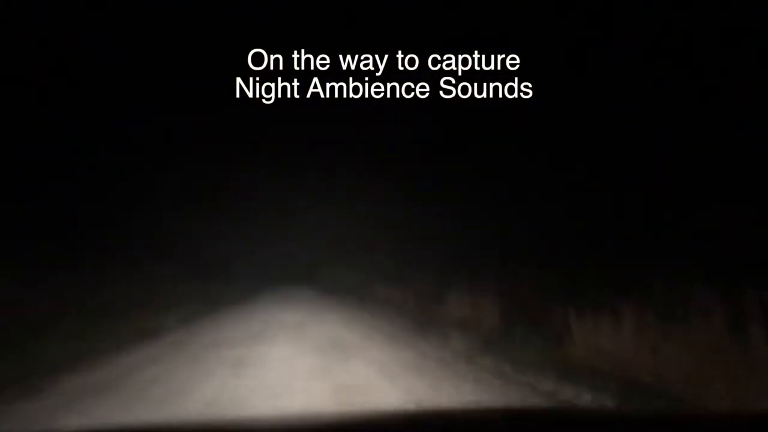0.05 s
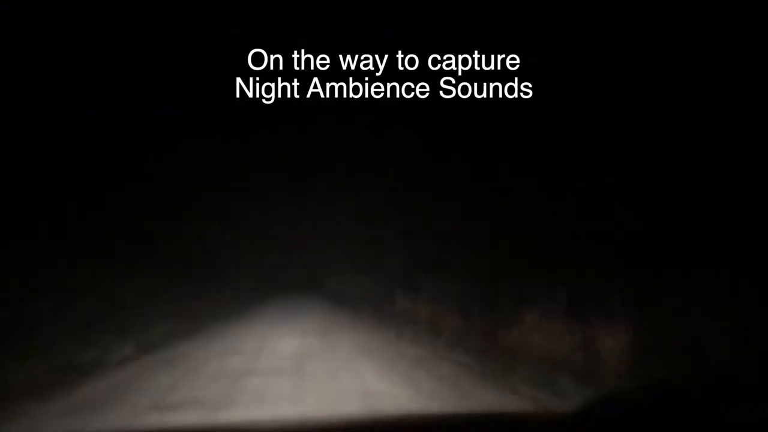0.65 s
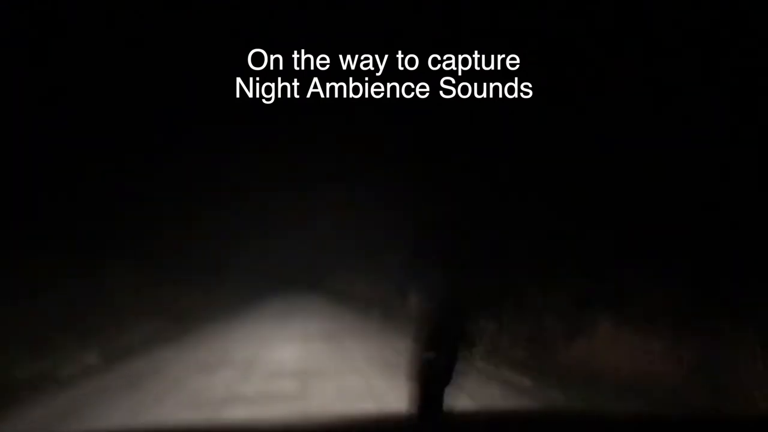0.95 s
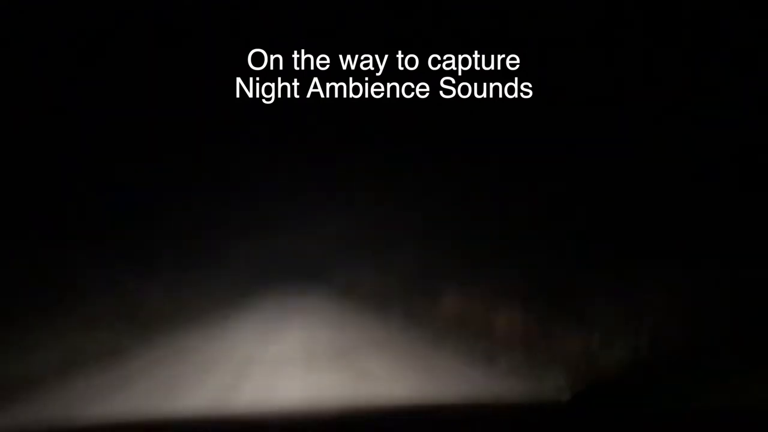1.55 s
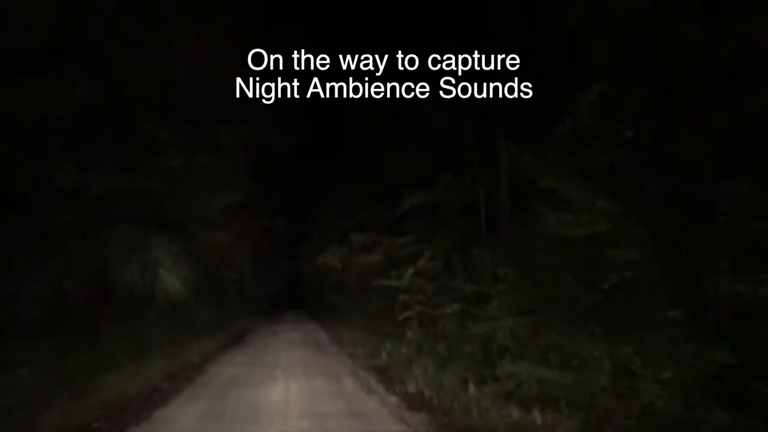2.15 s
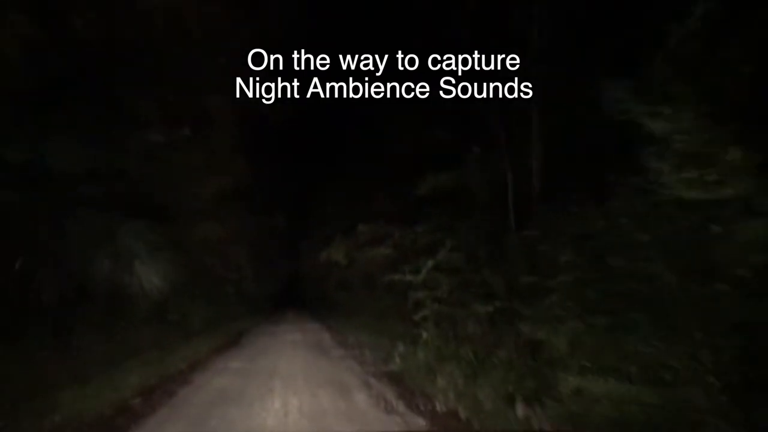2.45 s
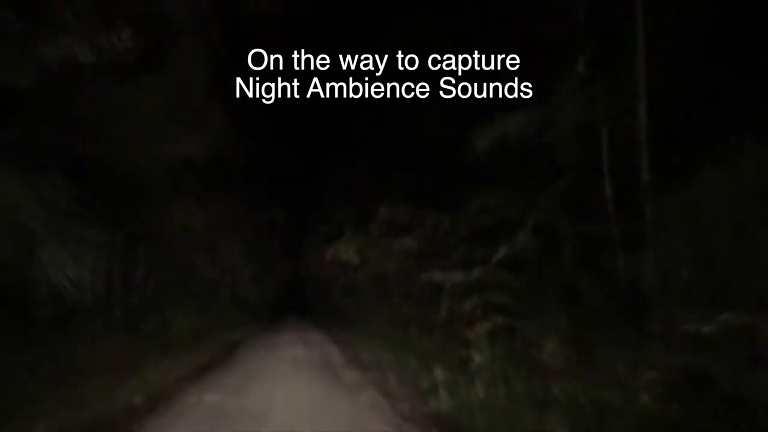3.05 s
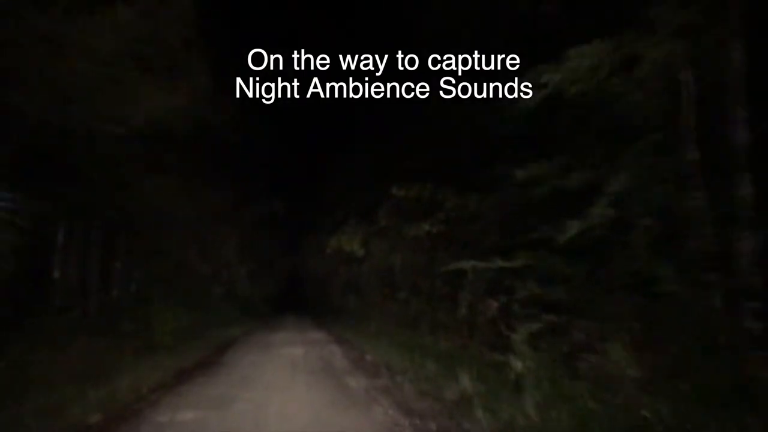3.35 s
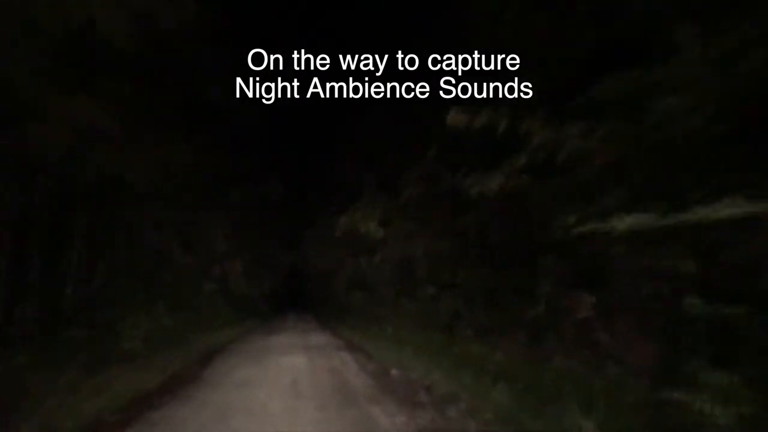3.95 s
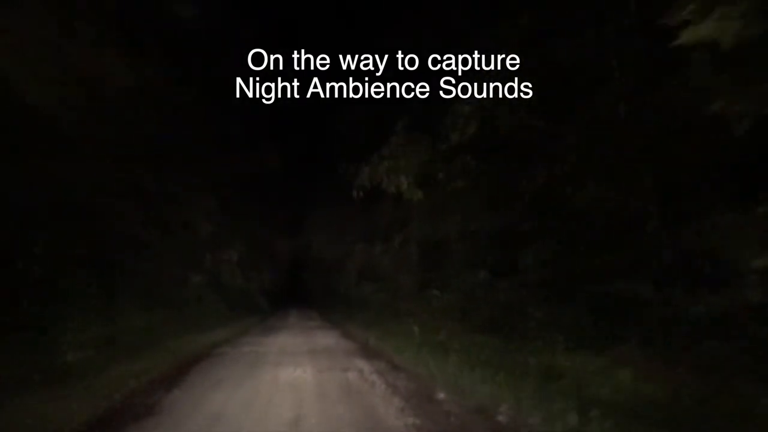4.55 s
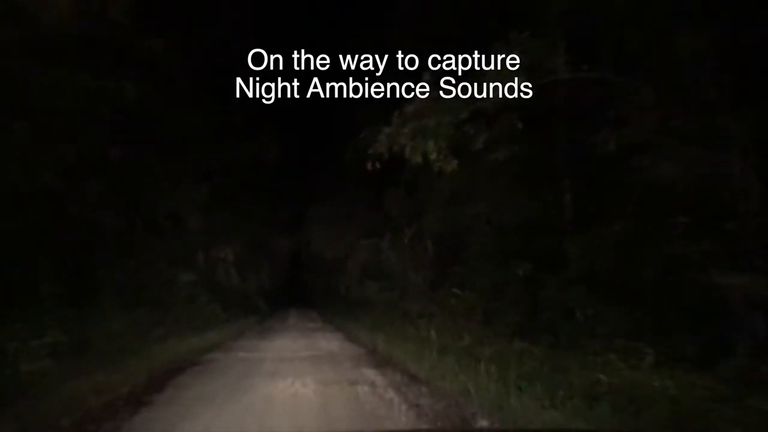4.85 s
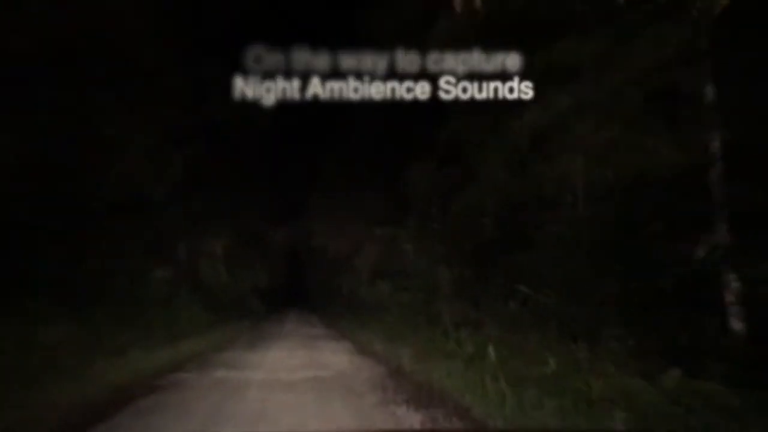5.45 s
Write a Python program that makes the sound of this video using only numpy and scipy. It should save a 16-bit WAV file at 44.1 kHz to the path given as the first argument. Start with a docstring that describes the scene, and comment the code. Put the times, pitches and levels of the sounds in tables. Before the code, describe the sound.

A car drives along a dirt road, heard from the front seat. A deep rumble and cabin boom run throughout, over a soft roar and crunch of tyres. The first part is rougher, with wheel thumps and small dry ticks close by. After about two seconds it cuts abruptly to a quieter stretch, where loose plastic trim rattles lightly and a faint rustle comes and goes.

```python
"""A car rumbles along a dirt road at night, heard from inside. The road shakes the body and makes the
cabin air boom at about 60 to 63 Hz, while the tyres hum, roar and crunch over grit. The wheels thump
on bumps, dry ticks sound close by, loose plastic trim rattles and a faint rustle comes and goes.
At 1.8 s the sound cuts abruptly from a louder, rougher part to a quieter one."""
import sys
import numpy as np
from scipy import signal
from scipy.fft import rfft, irfft, next_fast_len
from scipy.io import wavfile
from scipy.ndimage import map_coordinates

SR = 44100
rng = np.random.default_rng(int(sys.argv[2]) if len(sys.argv) > 2 else 0)


def wrap_up_sound(samples):
    """Save the sound to the file named by the first command line argument, as 16-bit audio."""
    columns = np.atleast_2d(samples).T
    # keep every value between -1 and 1, then stretch to whole-number steps
    tamed = np.clip(columns, -1, 1)
    steps = np.round(tamed * 32767).astype(np.int16)
    wavfile.write(sys.argv[1], SR, steps)


N = 242991

# How hard the road shakes the car: time_s, shake_db
ROAD_SHAKE = [(0, 2.5), (.1, 5), (.33, 2), (.5, 5.5), (.85, 4), (1.25, -1), (1.65, 1.5), (1.9, 0), (3.3, 0),
              (4.0, 0), (4.6, 0.5), (5.5, 1.1)]
# Tone of the car's deep heave, floor rumble and panel drone: frequency_hz, relative_db
HEAVE_TONE = [(19, -49.5), (26, -20.5), (32, -6.5), (39, -2), (47, 0.5), (58, -19), (80, -38)]
FLOOR_TONE = [(45, -32.5), (62, -3), (76, -0.5), (95, 1), (110, -5.5), (126, -5.5), (145, -12), (175, -21),
              (260, -44)]
PANEL_TONE = [(120, -23), (170, -5), (200, 3.5), (225, -0.5), (260, -1), (305, -3), (345, -8), (385, -15.5),
              (435, -15.5), (490, -21), (700, -37), (1200, -61)]
# Rippled ground that sets the cabin booming: start_s, length_s, push_db
RIPPLED_GROUND = [(0.077, 0.078, -33.5), (0.246, 0.075, -31.5), (0.607, 0.098, -35), (0.828, 0.062, -29),
                  (.94, .23, -28.5), (1.373, .08, -36), (1.968, 0.12, -36.5), (2.403, 0.082, -37.5),
                  (2.968, 0.3, -40), (3.888, 0.11, -37.5), (4.497, 0.07, -34), (5.242, 0.071, -34)]
# Air ringing inside the tyres: time_s, pitch_hz, level_db
TYRE_AIR = [(0, 250, -68), (.7, 250, -59.5), (1.3, 254, -72), (2.0, 256, -60.5), (3.2, 262, -64),
            (4.0, 266, -61.5), (5.5, 280, -62.5)]
# Tone of the tyres' roar and crunch, and of a fine hiss: frequency_hz, relative_db
DIRT_TONE = [(250, -8), (370, 1), (435, 3.5), (490, 0.5), (550, 5.5), (740, 0), (850, 1), (1100, -2.5),
             (1550, -7), (1950, -16), (2900, -22.5), (5000, -40.5)]
GRAVEL_TONE = [(900, -9), (1600, -4), (2300, -0.5), (3000, -1.5), (4100, -4), (4900, -12.5), (6500, -11.5),
               (9000, -36)]
HISS_TONE = [(3000, -13), (4800, -1), (6500, -0.5), (8000, -1.5), (10500, -4), (13000, -1), (14500, -6.5),
             (16000, -15)]
# Spells of faint rustle and hiss: start_s, length_s, middle_lift_db, treble_lift_db
RUSTLE_SPELLS = [(2.295, .22, 4.5, 5.5), (2.719, .65, 2, 8), (5.233, .3, 8, 8.5)]
# Wheels hitting bumps: start_s, thump_db, fade_s, thud_db, heave_db, shudder_db
# (fade_s is always the time a sound takes to fall by 60 dB)
WHEEL_BUMPS = [(0.054, -51.5, .16, -53, -45.5, -57), (0.448, -48.5, .07, -52, -41, -43),
               (0.826, -55, 0.17, -54, -51.5, -43.5), (1.205, -50.5, 0.13, -62, -43.5, -44),
               (1.43, -59, 0.059, -53, -48, -61.5), (1.647, -60, 0.086, -47.5, -35, -42.5),
               (2.34, -66, .12, -60, -54, -44), (2.76, -62, .16, -58, -40.5, -48),
               (3.12, -71, .1, -62, -51.5, -44), (4.32, -76, 0.085, -61, -44, -49),
               (5.36, -64, 0.11, -59, -48, -45.5)]
# Tone of a bump's thump and deeper thud: frequency_hz, relative_db
THUMP_TONE = [(180, -18), (320, 6), (550, 1), (850, -4), (1300, -16.5), (2200, -35.5)]
THUD_TONE = [(80, -18), (140, -1.5), (230, -4.5), (330, -6), (520, -25.5)]
# Small hard contacts: start_s, strength_db, brightness_db, favoured_pitch_hz
TICK_HITS = [(0.0851, -58.5, 3, 2700), (0.1319, -55.5, 1.5, 5400), (.204, -58, 2.5, 2800),
             (.2793, -67.5, 0, 6000), (.338, -62, 3.5, 8500), (0.3877, -62.5, -2, 4000),
             (.435, -62.5, -1, 5000), (0.4446, -70, -10, 4000), (0.4654, -57, 3.5, 3400),
             (.649, -71, -4.5, 4900), (.822, -59.5, -1, 8500), (.8534, -64, 0, 4900),
             (0.8685, -63, 0, 8800), (1.0411, -65, 2, 6800), (1.1473, -74.5, 0, 6060),
             (1.3334, -79, -3, 6000), (4.888, -89, -6, 3800), (5.041, -87, -9, 3800),
             (5.053, -86, -8, 3800)]
# The notes that ring in a tick: pitch_hz, relative_db, fade_s
TICK_NOTES = [(1510, -11, 0.0016), (2730, -1.5, 0.0033), (3950, -1.5, 0.005), (5350, -3, 0.0032),
              (6700, 1.5, 0.0025), (8500, -2.5, 0.0023), (11470, 4, 0.0018), (13080, 0.5, 0.0021)]
# Loose trim striking: start_s, strength_db, brightness_db, ring_strength_db
TRIM_HITS = [(.354, -73, 5, -81), (0.3578, -72.5, 5, -85), (0.4473, -71.5, -6.5, -85),
             (.766, -68, 4.5, -68), (0.776, -68, -1.5, -81), (1.207, -72.5, -8, -79),
             (2.296, -76, 1.5, -80), (2.308, -78, -4, -92), (2.3542, -77, -1.5, -91),
             (2.3925, -71, -2.5, -88), (2.671, -81, -9, -95), (2.735, -82, -9, -100),
             (2.748, -77, 2.5, -74), (2.769, -77, -3, -76), (2.839, -85, -10, -98), (3.063, -84, 2.5, -100),
             (3.263, -73, 4, -73), (3.281, -78, 2.5, -76), (3.487, -88, -6, -105), (3.637, -87, -6, -98),
             (3.89, -86, -4, -100), (4.1445, -87, -6, -100), (5.153, -80.5, 2, -75),
             (5.277, -75.5, -1, -73.5), (5.289, -91.5, 10.5, -93), (5.3357, -77.5, 5, -94),
             (5.362, -76, -4, -96), (5.389, -77, 2, -95), (5.428, -74.5, -4.5, -88), (5.44, -73.5, 8, -91),
             (5.464, -80.5, -5.5, -76), (5.503, -75, 0, -75)]
# Tone of a rattle's low knock, middle clack and high snap: frequency_hz, relative_db
KNOCK_TONE = [(300, -13.5), (800, -4), (1400, 6), (1900, -0.5), (2500, -1), (3300, -4), (5000, -21)]
CLACK_TONE = [(2000, -20.5), (3000, 0.5), (4400, -1), (5300, -1), (6400, -1.5), (7400, -9.5), (10000, -28)]
SNAP_TONE = [(5500, -22.5), (8000, 2.5), (9300, 3.5), (10400, -5), (12000, 4.5), (13500, -2), (16000, -7)]
# The notes the trim rings with: pitch_hz, relative_db, fade_s
TRIM_NOTES = [(1714, -4, 0.05), (2950, -4, 0.028), (3660, -6, 0.024), (4340, -2.5, 0.032),
              (4600, 3.5, 0.04), (6140, -2.5, 0.043), (6400, -10, 0.02)]

CUT_S = 1.8  # the sound cuts abruptly from louder and rougher to quieter
BOOM_IDLE_HZ, BOOM_IDLE_PUSH_DB = 60.1, -43  # the cabin boom between ripples
LOW_CUT_HZ, HIGH_CUT_HZ = 26.2, 15800


def amp(db):
    """Turn decibels into a number to multiply by."""
    return 10 ** (np.asarray(db) / 20)


def unit(x):
    """Scale a sound to an average power of 1."""
    return x / np.sqrt(np.mean(x ** 2) + 1e-20)


def curves(rows):
    """Join a table's points with lines: one curve for each column after the time."""
    times_s, *columns = np.transpose(rows)
    return [np.interp(np.arange(N) / SR, times_s, column) for column in columns]


def wobble(rate):
    """A smooth curve through `rate` random points a second."""
    points = rng.standard_normal(int(N * rate / SR) + 4)
    return map_coordinates(points, [np.arange(N) * rate / SR])


def swell(start_s, length_s, rise_s, fall_s):
    """A curve that rises from 0 to 1, holds, and falls once length_s has passed."""
    t = np.arange(N) / SR - start_s
    return np.clip(t / rise_s, 0, 1) * np.clip(1 - (t - length_s) / fall_s, 0, 1)


def filtered(x, gain_at):
    """Multiply each frequency in a sound by gain_at(hz)."""
    size = next_fast_len(N + SR // 2)
    return irfft(rfft(x, size) * gain_at(np.fft.rfftfreq(size, 1 / SR)), size)[:N]


def shaped(x, tone):
    """Give a sound the balance of lows and highs in a tone table, at power 1."""
    points_hz, db = np.transpose(tone)
    gain_at = lambda hz: amp(np.interp(np.log(hz + 1), np.log(points_hz), db, left=-120, right=-120))
    return unit(filtered(x, gain_at))


def noise(tone):
    """Noise with the given tone, at power 1."""
    return shaped(rng.standard_normal(N), tone)


def steady(x, span_s):
    """Even out the swells that last longer than span_s."""
    power = signal.fftconvolve(x ** 2, np.hanning(int(span_s * SR)), "same")
    return unit(x / np.sqrt(np.abs(power) + 1e-9))


def hum(hz, drift_hz, drift_rate):
    """A note kept ringing by the road; its pitch wanders."""
    pitch_hz = hz + drift_hz * wobble(drift_rate)
    return np.sqrt(2) * np.sin(2 * np.pi * np.cumsum(pitch_hz) / SR)


def grains(per_second, range_db):
    """Tiny impacts of uneven size at random moments."""
    hits = rng.random(N) < per_second / SR
    direction = np.sign(rng.standard_normal(N))
    return unit(hits * direction * amp(range_db * rng.random(N)))


def add(track, start_s, sound):
    """Mix a sound into the track at start_s."""
    room = track[max(round(start_s * SR), 0):][:len(sound)]
    room += sound[:len(room)]


def body_rumble(shake_db, before_cut):
    """The uneven road heaves the car, shakes its floor and makes the panels drone."""
    lurch, shudder = np.zeros((2, N))
    for start_s, *_, heave_db, shudder_db in WHEEL_BUMPS:
        # the springs take the load just before the blow
        load = swell(start_s - 0.07, length_s=0.098, rise_s=0.054, fall_s=0.07)
        lurch += amp(heave_db) * load
        shudder += amp(shudder_db) * load
    rolling = amp(-46.5 + 0.22 * shake_db + 1.5 * wobble(3.8))
    # hypot adds two levels by their power
    heave = np.hypot(rolling, lurch) * steady(noise(HEAVE_TONE), span_s=0.26)
    floor = np.hypot(amp(-46.5 + 0.92 * shake_db), shudder) * steady(noise(FLOOR_TONE), span_s=0.37)
    panels = amp(-58 + shake_db + 0.8 * before_cut) * steady(noise(PANEL_TONE), span_s=0.22)
    return heave + floor + panels


def cabin_boom():
    """The cabin air rings at its lowest note, steadier and a little higher when pushed harder."""
    push = sum(amp(db) * swell(start_s, length_s, rise_s=0.031, fall_s=0.05)
               for start_s, length_s, db in RIPPLED_GROUND)
    push_db = 20 * np.log10(np.hypot(amp(BOOM_IDLE_PUSH_DB), push))
    unrest = np.clip((-30 - push_db) / 9, 0.1, 1)  # 1 between ripples, 0.1 on the strongest
    pitch_hz = BOOM_IDLE_HZ + 3.38 * (1 - unrest)
    level_db = push_db - 2.5 + 2.6 * unrest * wobble(20)
    return amp(level_db) * hum(pitch_hz, drift_hz=4.415 * unrest, drift_rate=22)


def tyre_hum():
    """The air inside the tyres rings, its pitch rising with speed."""
    pitch_hz, level_db = curves(TYRE_AIR)
    return amp(level_db + 2.8 * wobble(11)) * hum(pitch_hz, drift_hz=4, drift_rate=30)


def tyre_noise_and_rustle(shake_db, before_cut):
    """Tyres roar on dirt and crunch gravel under a fine hiss; spells of faint rustle come and go."""
    middle_lift_db, treble_lift_db = sum(
        np.outer(lifts_db, swell(start_s, length_s, rise_s=0.029, fall_s=0.029))
        for start_s, length_s, *lifts_db in RUSTLE_SPELLS)
    roar_db = -76.5 + 0.52 * shake_db + 6.5 * before_cut + 0.3 * middle_lift_db
    crunch_db = -90.5 + 0.38 * shake_db + 7 * before_cut + middle_lift_db
    hiss_db = -95.5 + 7 * before_cut + treble_lift_db
    roar = amp(roar_db + 1.4 * wobble(24)) * noise(DIRT_TONE)
    gravel = shaped(rng.standard_normal(N) + 0.7 * grains(per_second=460, range_db=17), GRAVEL_TONE)
    fizz = shaped(rng.standard_normal(N) + 0.5 * grains(per_second=900, range_db=11), HISS_TONE)
    crunch = amp(crunch_db + 1.6 * wobble(35)) * gravel
    hiss = amp(hiss_db + 0.8 * wobble(16)) * fizz
    return roar + crunch + hiss


def wheel_bumps():
    """Dull blows come through the suspension, each with a deeper thud of the body."""
    thump, thud = np.zeros((2, N))
    t = np.arange(SR // 3) / SR
    for start_s, thump_db, fade_s, thud_db, *_ in WHEEL_BUMPS:
        blow = amp(-60 * t / fade_s) * (1 - np.exp(-t / 0.0036))
        add(thump, start_s, amp(thump_db) * blow)
        add(thud, start_s, amp(thud_db) * blow)
    return thump * noise(THUMP_TONE) + thud * noise(THUD_TONE)


def dry_ticks():
    """Tiny hard contacts: a touch, then the full strike under a millisecond later. Both die at once."""
    track, t = np.zeros(N), np.arange(SR // 80) / SR
    hz, note_db, fade_s = np.transpose(TICK_NOTES)[:, :, None]
    direction = (-1) ** np.arange(len(hz))[:, None]  # neighbouring notes swing opposite ways
    for start_s, strength_db, bright_db, favoured_hz in TICK_HITS:
        # a brighter contact rings the high notes more and the low ones less
        tilt_db = np.interp(hz, [4000, 5340, 8400, 11500], [-3.5 - bright_db, 0, 0, bright_db - 8])
        # the spot that is struck lifts the notes near one pitch
        lift_db = 3.5 * np.exp(-(np.log2(hz / favoured_hz) / 0.35) ** 2)
        level_db = note_db + strength_db + tilt_db + lift_db + 12
        phase = 2 * np.pi * hz * (1 + 0.03 * rng.standard_normal(hz.shape)) * t
        strike = np.sum(direction * amp(level_db - 60 * t / fade_s) * np.sin(phase), axis=0)
        add(track, start_s + 0.0003, 0.5 * strike)
        add(track, start_s + rng.uniform(0.00068, 0.00089), strike)
    return track


def faint_trim_hits(count):
    """The trim also stirs faintly at random moments: more rows like those of TRIM_HITS."""
    starts_s = (np.arange(count) + rng.random(count)) / count * N / SR
    return [(start_s, rng.normal(-91, 2.2), -4.5, -100) for start_s in starts_s]


def trim_rattles():
    """Loose plastic trim knocks, clacks, snaps and rings briefly; the small cabin adds a short tail."""
    t = np.arange(SR // 6) / SR
    cabin_tail = 0.31 * amp(-60 * t / 0.12)
    blow = lambda rise_s, fade_s: (1 - np.exp(-t / rise_s)) * (amp(-60 * t / fade_s) + cabin_tail)
    knock, clack, snap, ring = np.zeros((4, N))
    for start_s, db, bright_db, ring_db in TRIM_HITS + faint_trim_hits(count=10):
        add(knock, start_s, amp(db - bright_db + 5.5) * blow(rise_s=0.0011, fade_s=0.038))
        add(clack, start_s, amp(db + 5) * blow(rise_s=0.00032, fade_s=0.018))
        add(snap, start_s, amp(db + bright_db - 0.6) * blow(rise_s=0.00079, fade_s=0.018))
        notes = np.zeros(len(t))
        for hz, note_db, fade_s in TRIM_NOTES:
            loudness = amp(note_db + rng.normal(0, 2.7) - 60 * t / fade_s)
            notes += loudness * np.sin(2 * np.pi * hz * rng.normal(1, 0.0098) * t)
        add(ring, start_s, amp(ring_db + 1.5) * notes * (1 - np.exp(-t / 0.00087)))
    return knock * noise(KNOCK_TONE) + clack * noise(CLACK_TONE) + snap * noise(SNAP_TONE) + ring


def scene():
    """Everything as heard from the front seat, in one channel."""
    shake_db, = curves(ROAD_SHAKE)
    before_cut = np.arange(N) / SR < CUT_S  # 1 in the louder first part, then 0
    car = body_rumble(shake_db, before_cut) + cabin_boom()
    tyres = tyre_hum() + tyre_noise_and_rustle(shake_db, before_cut)
    return (car + tyres + wheel_bumps() + dry_ticks() + trim_rattles())[None]


def record(dry):
    """Start and stop softly, and cut the deepest bass and the highest treble."""
    soft_edges = signal.windows.tukey(N, 0.002)
    low_cut = lambda hz: hz ** 6 / np.sqrt(hz ** 12 + LOW_CUT_HZ ** 12)
    return filtered(dry[0] * soft_edges, lambda hz: low_cut(hz) * (hz < HIGH_CUT_HZ))[None]


dry = scene()
out = record(dry)
wrap_up_sound(out)
```